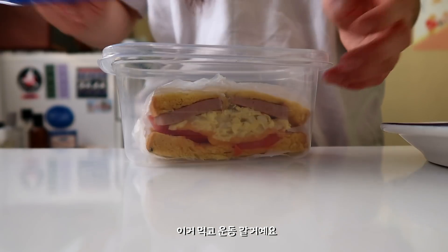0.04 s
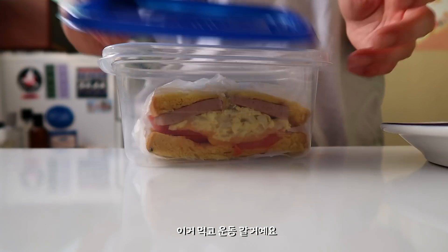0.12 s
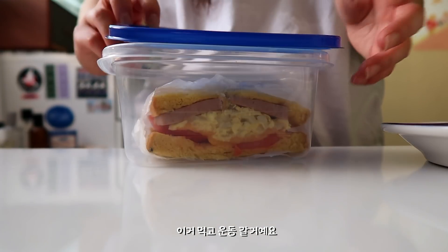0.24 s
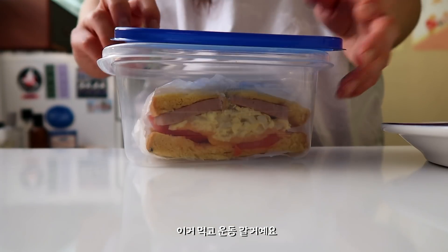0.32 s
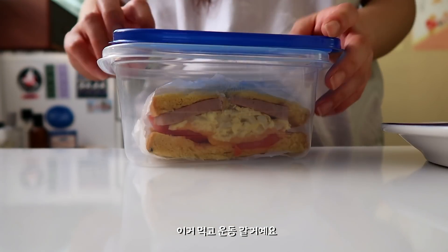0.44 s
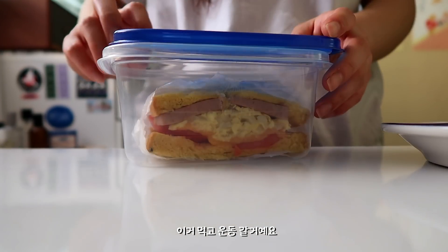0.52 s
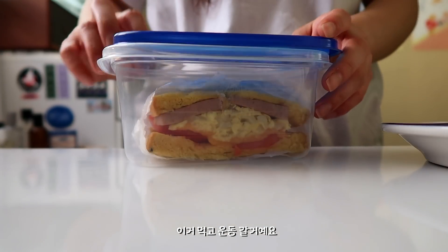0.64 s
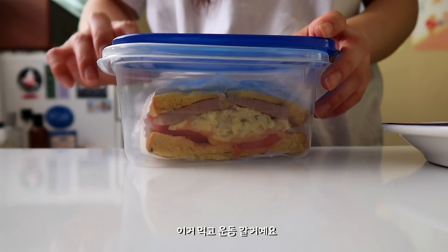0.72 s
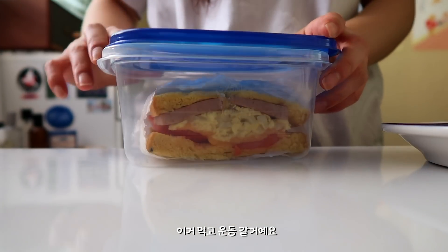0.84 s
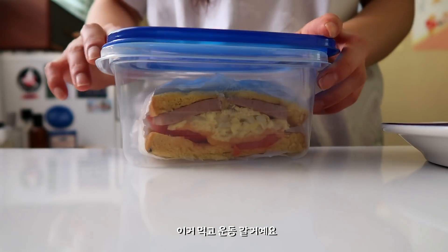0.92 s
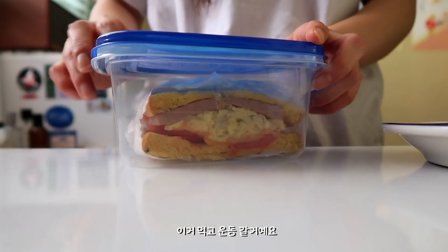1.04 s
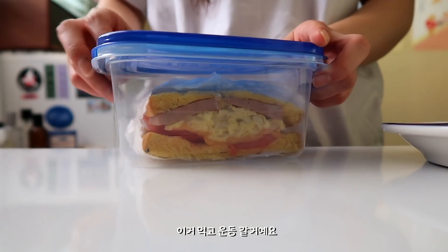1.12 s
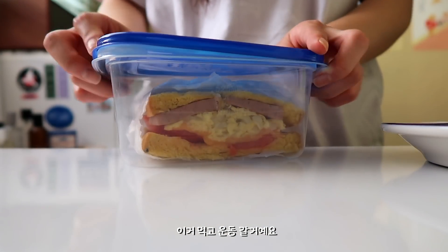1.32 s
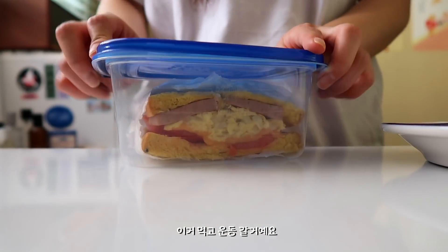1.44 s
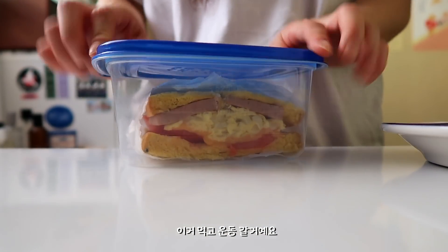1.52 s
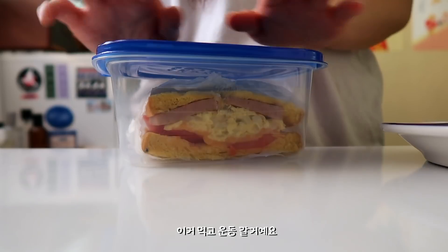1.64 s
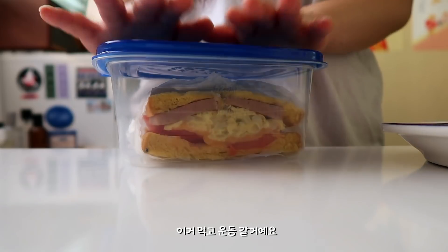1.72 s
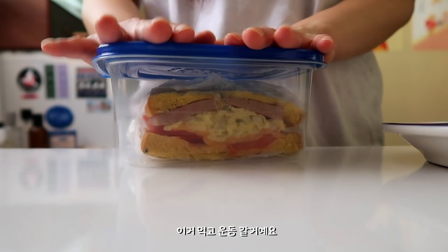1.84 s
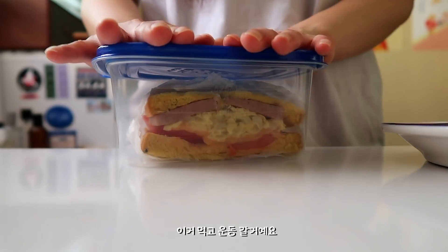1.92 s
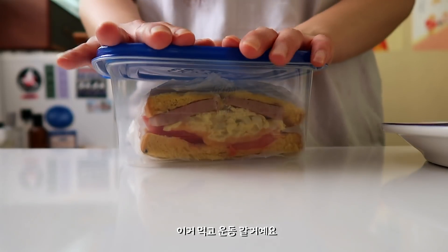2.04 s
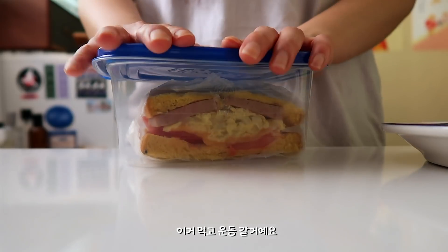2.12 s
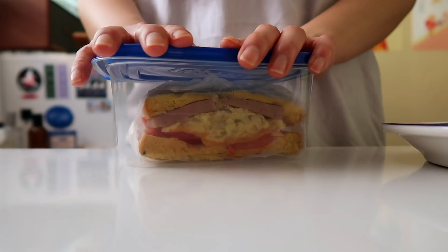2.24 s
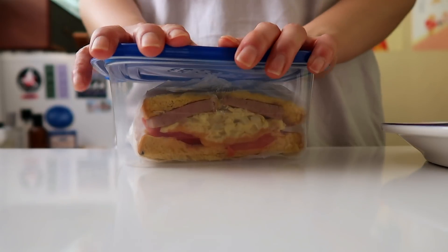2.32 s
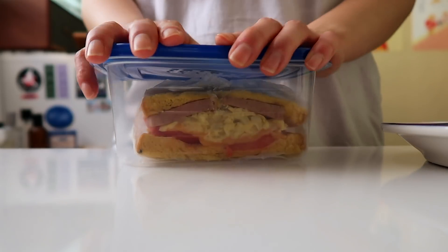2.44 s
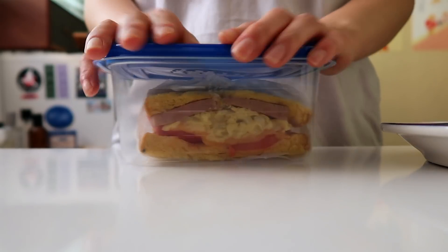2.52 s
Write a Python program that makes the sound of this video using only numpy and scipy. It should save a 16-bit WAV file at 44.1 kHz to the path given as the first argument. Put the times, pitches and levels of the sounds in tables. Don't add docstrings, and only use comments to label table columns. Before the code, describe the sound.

A plastic food tub lid is fitted, heard very close. A bright hard clack at 0.2 s, then small ticks and dry scraping; a sharper double knock at 1.1 s, more shuffling, and a loud crisp snap at 1.45 s. After a near-quiet gap, pressing clicks at 1.9 and 2.15 s, then quick creaky ticks and rubs until about 2.55 s. Short faint room reflections, low hum.

```python
import sys
import numpy as np
from scipy import signal
from scipy.fft import rfft, irfft
from scipy.io import wavfile
from scipy.ndimage import uniform_filter1d

SR = 44100
rng = np.random.default_rng(int(sys.argv[2]) if len(sys.argv) > 2 else 0)


def ratio_of_db(decibels):
    return 10 ** (np.asarray(decibels, float) / 20)


def file_out(sig):
    cols = np.atleast_2d(sig).T
    lim = np.clip(cols, -1, 1)
    pcm = np.round(lim * 32767).astype(np.int16)
    wavfile.write(sys.argv[1], SR, pcm)


N = 112455

# frequency [Hz], density [dB per Hz]
AIR = [(15, -47), (25, -6.5), (88, 0), (172, -13.5), (301, -10.5), (709, -23.5), (3350, -34.5),
       (12100, -52), (15000, -56)]
# frequency [Hz], side minus mid [dB]
AIR_SIDE = [(60, -46), (110, -25), (200, -11), (380, -8), (700, -4), (1290, -1), (2380, -2.5), (4400, 0.5),
            (8120, 2), (15000, 3)]
# frequency [Hz], level [dB rms]
HUM = [(39, -50), (78, -50.5), (119, -61)]
HUM_SWAY_DB = [1.2, 2.5, 3.5]
AIR_DB, HUM_WANDER_CYCLES = -48, 0.04

# start [s], length [s], lid level [dB], rim level [dB], skin level [dB]
SCRAPES = [(0.125, 0.01, -80, -80, -59), (0.209, 0.024, -40, -51, -50), (0.367, 0.053, -52, -55, -60),
           (0.45, 0.071, -54.5, -59.5, -59.5), (0.6, 0.14, -55, -54, -64), (0.716, 0.049, -48, -45.5, -60),
           (0.764, 0.044, -40.5, -40.5, -56.5), (0.806, 0.16, -52, -49, -66),
           (0.983, 0.097, -60.5, -52.5, -71), (1.058, 0.058, -54, -46, -50.5),
           (1.153, 0.079, -52.5, -46.5, -61), (1.212, 0.055, -42, -49, -56.5),
           (1.283, 0.12, -49, -53.5, -62), (1.385, 0.11, -46.5, -49, -62.5),
           (1.433, 0.028, -69, -58, -47.5), (1.522, 0.043, -50.5, -51, -65),
           (1.826, 0.035, -46.5, -45.5, -59), (2.12, 0.1, -49, -62, -60), (2.243, 0.084, -53, -46.5, -65.5),
           (2.324, 0.066, -70, -56, -70), (2.38, 0.071, -55.5, -46, -65), (2.441, 0.085, -55.5, -46.5, -60),
           (2.516, 0.087, -55, -49.5, -54.5)]
# frequency [Hz], density [dB per Hz]
LID_RUB = [(100, -16), (300, -11), (800, 2), (1200, -11.5), (2000, -40), (9000, -69)]
RIM_RUB = [(300, -18), (1200, -10.5), (1800, 4), (2300, 3.5), (3200, -5.5), (4500, -11.5), (5500, -30.5),
           (9000, -41.5)]
SKIN_RUB = [(500, 11.5), (2000, 11.5), (4000, 10.5), (8000, 1.5), (11000, -12), (15000, -23)]
PATCHY_DB = 2.0
SCRAPE_RISE, SCRAPE_TAIL_S = 0.35, 0.016
GRAINS_PER_S, GRAIN_DB, GRAIN_T60_S = 900, 3.0, 0.012

# start [s], crack level [dB], lid level [dB], tub level [dB], struck spot's pitch [Hz]
LOOSE_TAPS = [(.2027, -7.5, -19.5, -16.5, 2230), (.2595, -26.5, -62, -33.5, 1750),
              (.2688, -20, -46, -33.5, 2840), (.3338, -29.5, -38, -40.5, 2520),
              (.578, -37.5, -42.5, -38.5, 2000), (.623, -35, -50.5, -42, 1940),
              (.6565, -43, -51, -60, 2000), (.7085, -41, -71, -60, 2320), (.7257, -33.5, -62, -47, 3520),
              (.742, -33, -54, -39, 1800), (.7785, -30.5, -41, -32, 2200), (.7922, -26, -33, -38.5, 2000),
              (.8005, -33.5, -30.5, -33, 2320), (.804, -27, -38.5, -43, 1490),
              (.880, -21.5, -35.5, -42.5, 2410), (.9645, -40.5, -44, -49, 1800)]
TILTED_TAPS = [(1.062, -36, -58, -44, 2320), (1.0765, -27.5, -60, -51, 3500), (1.0903, -35, -24, -49, 2500),
               (1.1003, -19, -34, -17, 2000), (1.1042, -17, -18.5, -23, 2180),
               (1.1455, -38, -46, -56, 1900), (1.178, -38, -47, -44, 2180), (1.1905, -37.5, -60, -62, 2200),
               (1.2095, -44, -61, -51, 1900), (1.227, -40, -63, -60, 3500), (1.239, -32, -49, -45, 2000),
               (1.2455, -37, -42, -40, 1500), (1.257, -31, -42, -57, 2000),
               (1.3175, -37.5, -41.5, -56, 2160), (1.3365, -51, -65, -55, 2000),
               (1.3495, -32, -42, -41, 2200), (1.3945, -41, -37, -40.5, 1500), (1.416, -40, -60, -57, 4000)]
SEATED_TAPS = [
    (1.445, -6.5, -14, -39, 1840),
    (1.4477, -13.5, -30.5, -20.5, 2500),
    (1.551, -45, -49.5, -43, 2970),
]
PRESSED_TAPS = [(1.811, -46, -46, -70, 1510), (1.8415, -36, -39.5, -27.5, 2000),
                (1.854, -38, -44, -28.5, 2000), (1.899, -33, -39, -33, 1500),
                (1.9123, -14.5, -27.5, -30.5, 1700), (2.113, -36.5, -45, -42, 1500),
                (2.128, -42, -42.5, -55, 2000), (2.1515, -15.5, -23.5, -31.5, 2500),
                (2.1775, -31, -31, -40.5, 2000), (2.2003, -27, -31, -39, 1870),
                (2.2035, -21.5, -31, -52, 1630), (2.222, -44, -32.5, -39, 2200),
                (2.2555, -31, -30, -42, 1190), (2.2635, -24, -32.5, -44, 2030),
                (2.2932, -19, -43, -69, 1410), (2.3066, -23, -60, -72, 2160),
                (2.3985, -40.5, -60, -64, 2180), (2.4135, -37, -51, -42, 2340),
                (2.4215, -37, -55, -67, 2200), (2.459, -43, -35, -36.5, 2330), (2.515, -39, -65, -57, 2300),
                (2.5295, -33, -38, -33.5, 1780), (2.538, -30, -53, -56, 1690),
                (2.5445, -26, -37, -38, 1900)]
# frequency [Hz], level [dB]
LOOSE_RIM = [(1460, 5), (1770, 14), (2360, 9.5), (2900, 6.5), (3270, 9), (4200, 11.5), (4500, -16),
             (5330, -17), (5760, -25), (6790, -13), (7600, -11), (9500, -3), (11500, -5), (13500, -5)]
TILTED_RIM = [(1170, 6.5), (1550, 3), (1900, 8), (2200, 4.5), (2550, 0.5), (3400, 2), (3950, -1.5),
              (4800, -11), (5390, -11), (5930, -15), (6980, -17), (9000, -14), (11000, -20), (13500, -22)]
SEATED_RIM = [(1160, 7), (1535, 7), (1910, 2), (2400, -3.5), (3030, 2.5), (3500, 5.5), (3830, -2.5),
              (4240, 2.5), (5000, -1), (5600, -12), (6450, -3), (7250, -12), (8500, -10), (13500, -10)]
PRESSED_RIM = [(1150, 10), (1450, 1), (1690, 5), (1970, 7.5), (2240, 10.5), (2430, -2), (2880, 10),
               (3200, 0.5), (3550, 3), (4150, 3), (4530, -3), (6300, 0), (7300, 2), (10000, -4)]
# frequency [Hz], level [dB], decay time T60 [s]
LOOSE_LID = [(430.6, -9, 0.092), (528, -3.5, 0.075), (645, 5, 0.014), (870, -4, 0.086)]
LOOSE_TUB = [(113, -7.5, 0.075), (187.4, -4.5, 0.091), (255, -9, 0.13), (338, -5, 0.038)]
TILTED_LID = [(416, -4, 0.044), (526, 1, 0.017), (639, -6, 0.042), (834, -8.5, 0.02), (1170, -9, 0.043)]
TILTED_TUB = [(134.4, 1, 0.11), (193, -8.5, 0.061), (259.6, -2, 0.11), (348, -4.5, 0.1)]
SEATED_LID = [(390, -12, 0.039), (595, -3, 0.032), (642, 0, 0.086), (796, -3.5, 0.078), (1190, -3.5, 0.044)]
SEATED_TUB = [(72.5, -7.5, 0.117), (140, -6, 0.116), (201, -5, 0.11), (267.6, -0.5, 0.08), (335, -7, 0.072)]
PRESSED_LID = [(298, -14.5, 0.02), (585, -0.5, 0.026), (632.6, 1, 0.032), (865, -7.5, 0.027),
               (1174, -11.5, 0.048)]
CRACK_DB, LID_DB, TUB_DB = 1.5, 4.5, 6
CRACK_PUSH_S, LID_PUSH_S, TUB_PUSH_S = 0.000026, 0.0001, 0.00036
HARDER_IS_SHORTER = 0.21
RIM_T60_S, RIM_REF_HZ = 0.0074, 2000
SPOT_DB, SPOT_OCTAVES = 6, 0.4
SCATTER_DB, DETUNE = 1.8, 0.012
CHATTER_DB, BODY_CHATTER_DB, CHATTER_T60_S = -33, -38, 0.08
SWELL_S = 0.00018
RADIATES_FROM = 0.85

# frequency [Hz], level [dB]
MIC = [(20, -51), (60, -6), (100, -2.5), (11000, 1), (15300, -4), (16300, -21)]
# frequency [Hz], side minus mid [dB]
PORT_SIDE = [(60, -58), (400, -23.5), (1300, -29.5), (2400, -19), (4400, -7.5), (8000, 1), (15000, 15)]
ROOM_T60_S, ROOM_DB, ROOM_HZ = 0.26, -22.5, 3670


def colour(x, points, turn=1):
    hz_points, db_points = np.array(points, float).T
    hz = np.maximum(np.arange(N // 2 + 1) * SR / N, 1)
    gain = ratio_of_db(np.interp(np.log(hz), np.log(hz_points), db_points))
    return irfft(rfft(x) * turn * gain, N)


def unit(x):
    return x / np.sqrt(np.mean(x ** 2))


def walk(rate):
    hold = int(SR / rate)
    steps = np.repeat(rng.standard_normal(N // hold + 1), hold)
    smooth = uniform_filter1d(uniform_filter1d(steps, hold), hold)
    return unit(smooth[:N])


def fade(t, t60):
    return np.exp(-np.log(1000) * t / t60)


def appliance_hum():
    t = np.arange(N) / SR
    hum = np.zeros(N)
    for (hz, db), sway_db in zip(HUM, HUM_SWAY_DB):
        level = np.sqrt(2) * ratio_of_db(db + sway_db * walk(3.6))
        hum += level * np.sin(2 * np.pi * (hz * t + HUM_WANDER_CYCLES * walk(4.44)))
    return hum


def kitchen():
    mid, other = (unit(colour(rng.standard_normal(N), AIR)) * ratio_of_db(AIR_DB) for _ in range(2))
    mid = mid + appliance_hum()
    side = colour(other, AIR_SIDE)
    return np.array([mid + side, mid - side])


def grains(points):
    t = np.arange(SR // 50) / SR
    sizes = ratio_of_db(GRAIN_DB * np.minimum(rng.exponential(size=N), 3))
    slips = (rng.random(N) < GRAINS_PER_S / SR) * sizes
    rough = signal.fftconvolve(slips, fade(t, GRAIN_T60_S))[:N] * rng.standard_normal(N)
    return unit(colour(rough, points)) * ratio_of_db(PATCHY_DB * walk(60))


def scrapes():
    t = np.arange(N) / SR
    strokes = np.zeros((3, N))
    for s, length, *db in SCRAPES:
        rise = np.clip((t - s) / (SCRAPE_RISE * length), 0, 1)
        release = np.exp(-np.maximum(t - s - length, 0) / SCRAPE_TAIL_S)
        strokes += ratio_of_db(db)[:, None] * rise * release
    skin = unit(colour(rng.standard_normal(N), SKIN_RUB)) * ratio_of_db(PATCHY_DB * walk(59.47))
    lid, rim = grains(LID_RUB), ratio_of_db(-4.5) * grains(RIM_RUB)
    return strokes[0] * lid + strokes[1] * rim + strokes[2] * skin


def ring(modes, chance, push_s, chatter_db, flip=-1):
    mode_hz, mode_db, t60 = np.array(modes, float).T
    detune, scatter = chance[:2 * len(modes)].reshape(2, -1)
    hz = mode_hz * (1 + DETUNE * detune)
    gain = ratio_of_db(mode_db + SCATTER_DB * scatter) * flip ** np.arange(len(modes))
    u = np.arange(int(min(t60.max(), 0.2) * SR)) / SR
    y = gain @ (np.sin(2 * np.pi * hz[:, None] * u) * fade(u, t60[:, None]))
    y = y * (1 - np.exp(-u / SWELL_S))
    t = np.arange(SR // 20) / SR
    force = ratio_of_db(chatter_db) * chance[-len(t):] * fade(t, CHATTER_T60_S)
    force[0] = 1
    t = t[:SR // 100]
    push = t * np.exp(-t / push_s)
    y = signal.fftconvolve(signal.fftconvolve(y, force), push)
    return y / np.abs(y).max()


def struck_rim(rim, spot_hz, soft):
    struck = []
    for hz, db in rim:
        near_spot = np.exp(-(np.log2(hz / spot_hz) / SPOT_OCTAVES) ** 2)
        struck.append((hz, db + SPOT_DB * soft * near_spot, RIM_T60_S * np.sqrt(RIM_REF_HZ / hz)))
    return struck


def taps(table, rim, lid, tub):
    out = np.zeros(N + SR)
    thin = signal.butter(2, RADIATES_FROM * rim[0][0], "high", fs=SR, output="sos")
    for s, crack_db, lid_db, tub_db, spot_hz in table:
        chance = rng.standard_normal((3, SR // 10))
        soft = ratio_of_db(-HARDER_IS_SHORTER * crack_db)
        edge = struck_rim(rim, spot_hz, soft)
        crack = ring(edge, chance[0], CRACK_PUSH_S * soft, CHATTER_DB, flip=0.98)
        crack = ratio_of_db(crack_db + CRACK_DB) * signal.sosfilt(thin, crack)
        lid_ring = ring(lid, chance[1], LID_PUSH_S * soft, BODY_CHATTER_DB)
        tub_ring = ring(tub, chance[2], TUB_PUSH_S * soft, BODY_CHATTER_DB)
        start = int(s * SR)
        for y in (crack, ratio_of_db(lid_db + LID_DB) * lid_ring, ratio_of_db(tub_db + TUB_DB) * tub_ring):
            out[start:start + len(y)] += y
    return out[:N]


def room_tail(near):
    t = np.arange(SR // 2) / SR
    tail = rng.standard_normal((2, len(t))) * fade(t, ROOM_T60_S) * np.clip(t / 0.0019, 0, 1)
    band = signal.butter(1, [250, ROOM_HZ], "band", fs=SR, output="sos")
    tail = signal.sosfilt(band, tail)
    tail = tail * ratio_of_db(ROOM_DB) / np.sqrt(np.sum(tail[0] ** 2))
    return signal.fftconvolve(near[None], tail, axes=1)[:, :N]


def scene():
    near = scrapes()
    near = near + taps(LOOSE_TAPS, LOOSE_RIM, LOOSE_LID, LOOSE_TUB)
    near = near + taps(TILTED_TAPS, TILTED_RIM, TILTED_LID, TILTED_TUB)
    near = near + taps(SEATED_TAPS, SEATED_RIM, SEATED_LID, SEATED_TUB)
    near = near + taps(PRESSED_TAPS, PRESSED_RIM, PRESSED_LID, SEATED_TUB)
    near = colour(near, MIC)
    wet = room_tail(near)
    mid = near + wet[0]
    side = colour(near, PORT_SIDE, turn=1j) + ratio_of_db(-20) * wet[1]
    return kitchen() + np.array([mid + side, mid - side])


def roll_off(x):
    return signal.sosfilt(signal.butter(12, 16410, fs=SR, output="sos"), x)


def record(dry):
    return roll_off(dry)


dry = scene()
out = record(dry)
file_out(out)
```